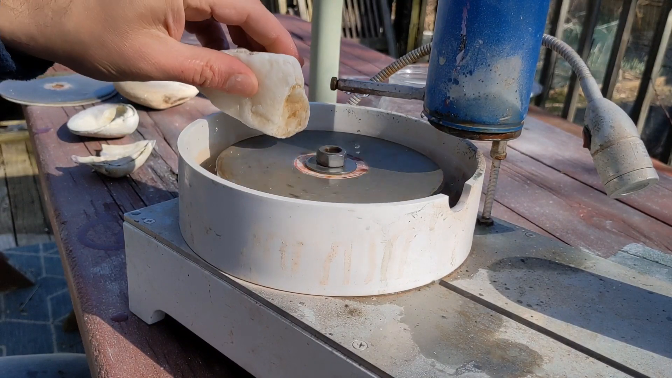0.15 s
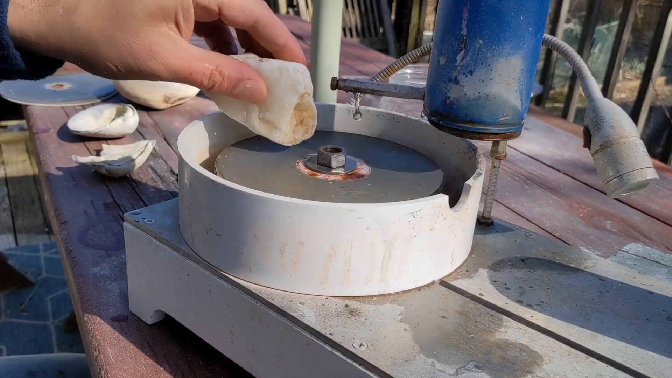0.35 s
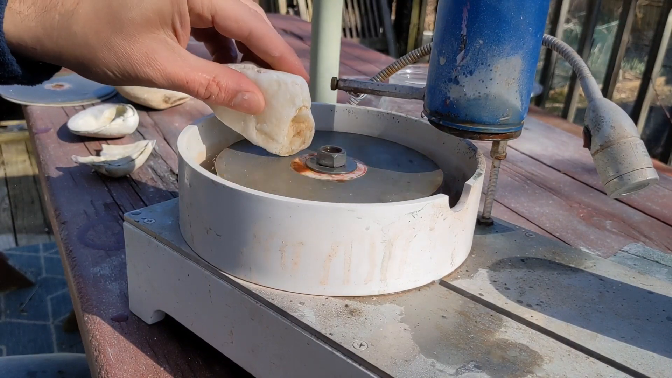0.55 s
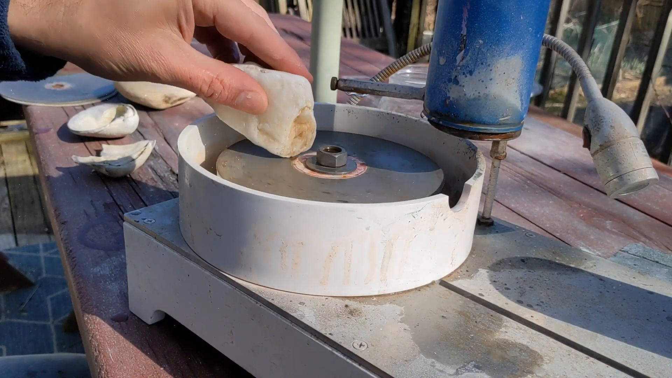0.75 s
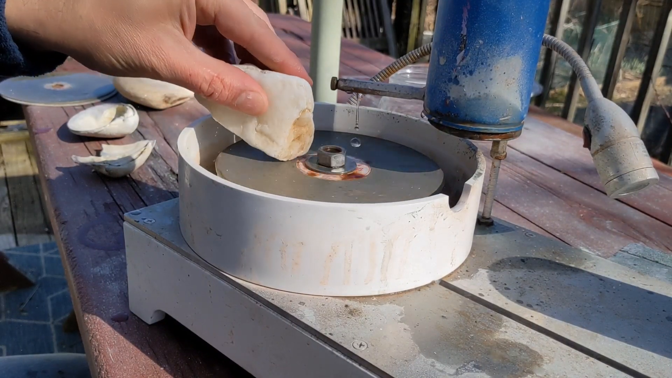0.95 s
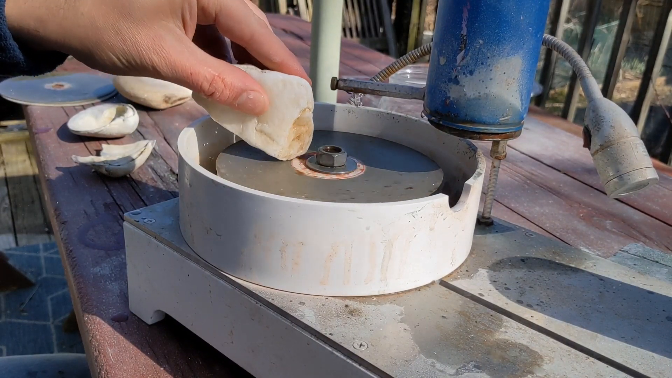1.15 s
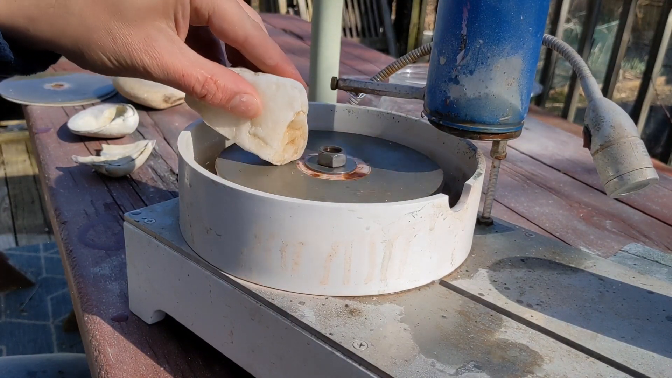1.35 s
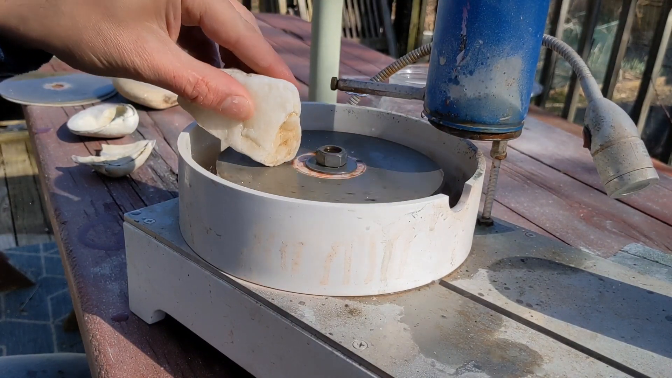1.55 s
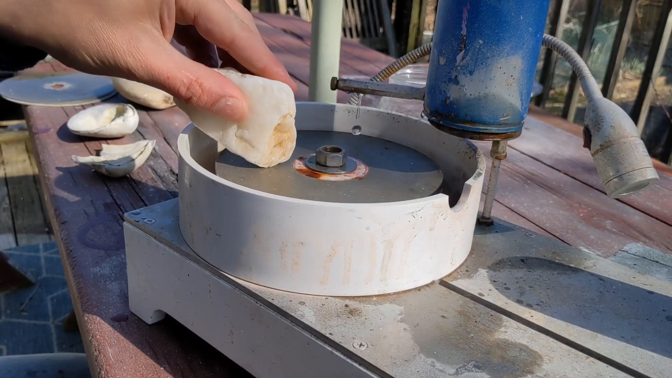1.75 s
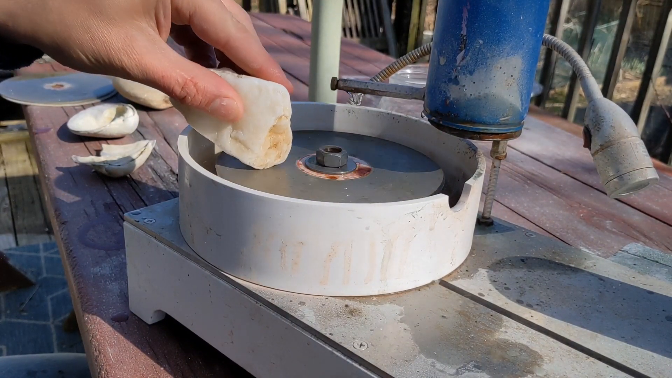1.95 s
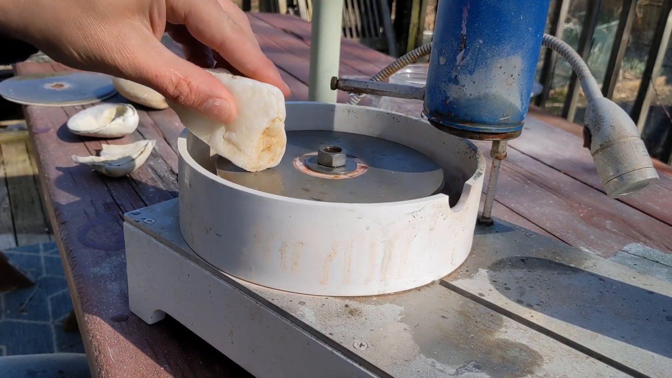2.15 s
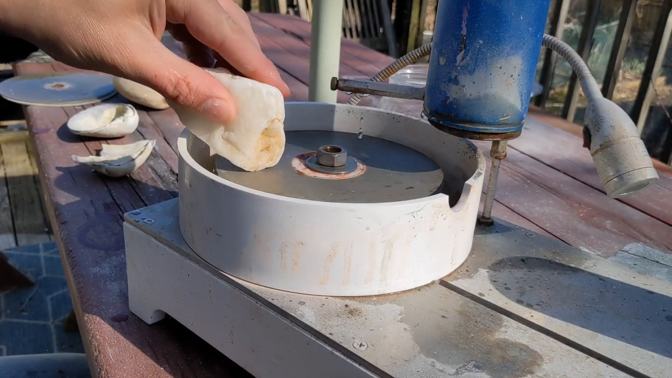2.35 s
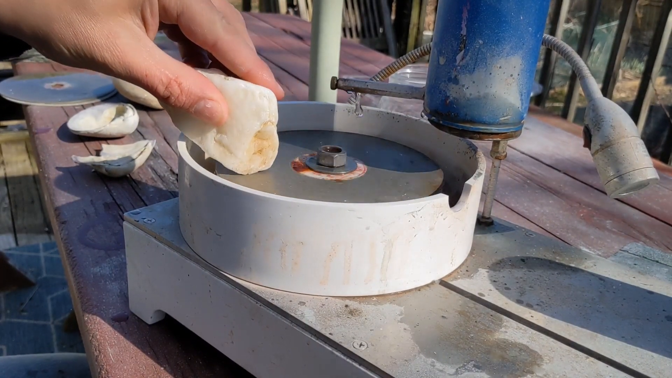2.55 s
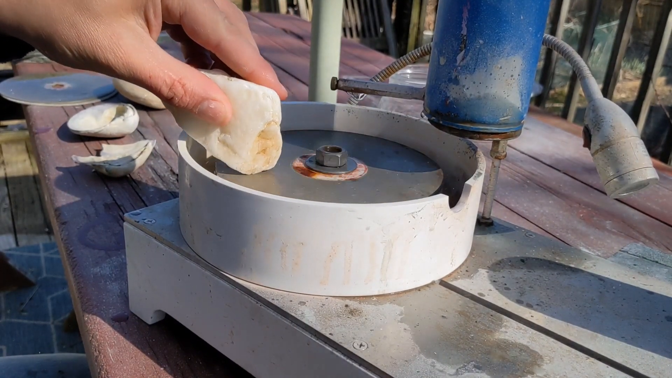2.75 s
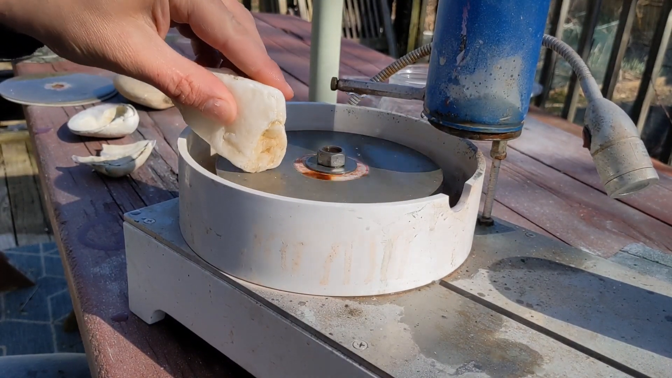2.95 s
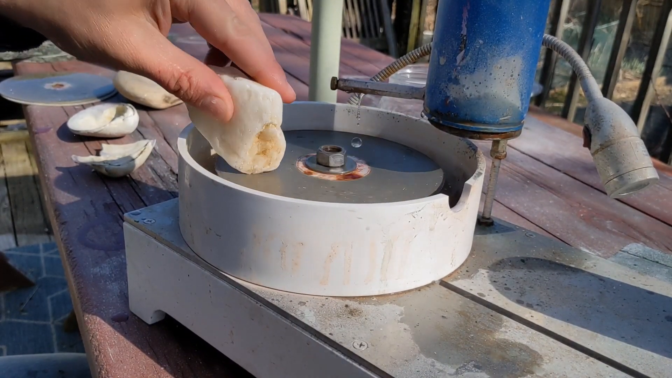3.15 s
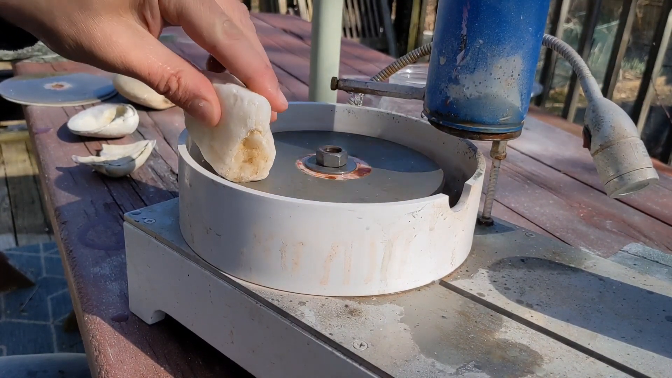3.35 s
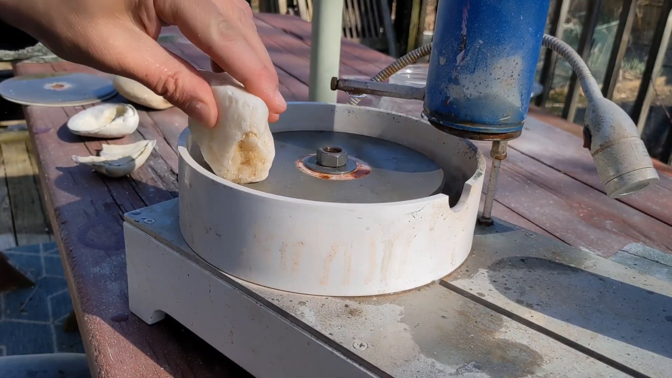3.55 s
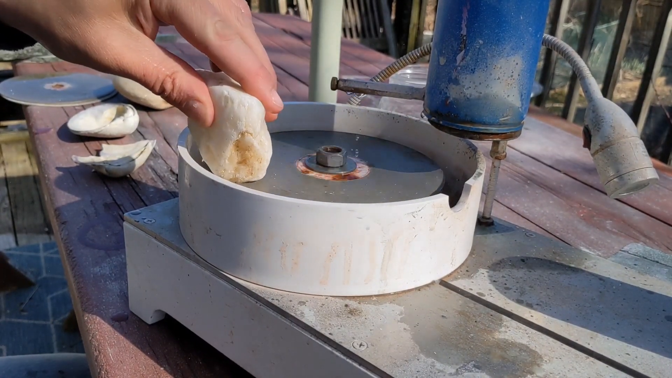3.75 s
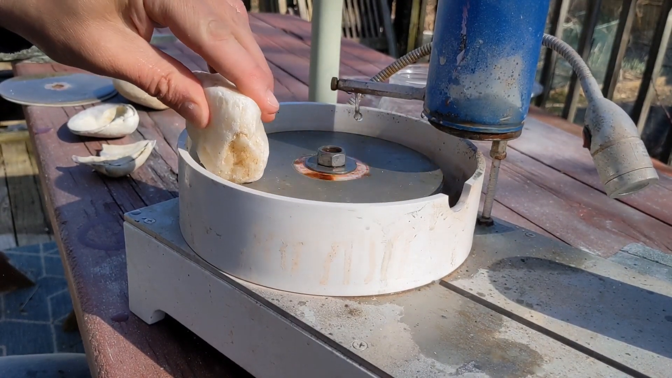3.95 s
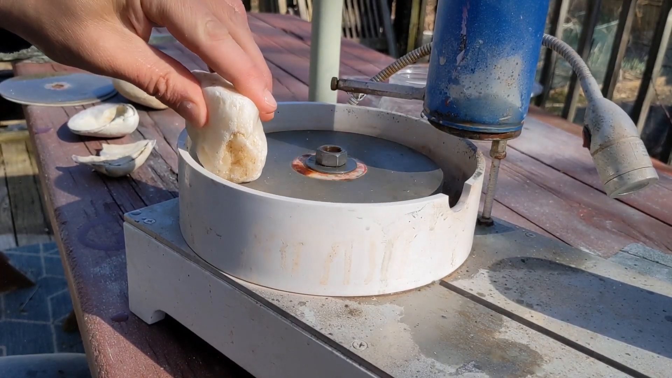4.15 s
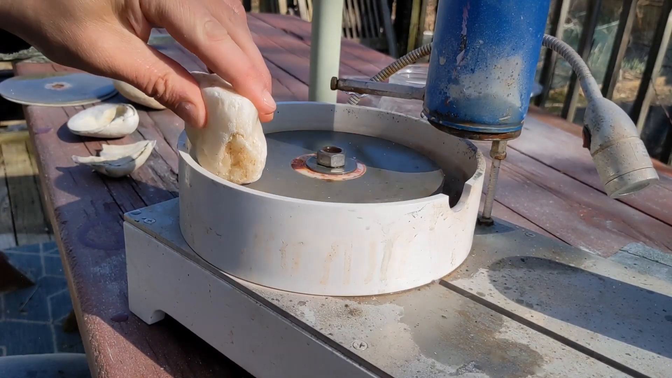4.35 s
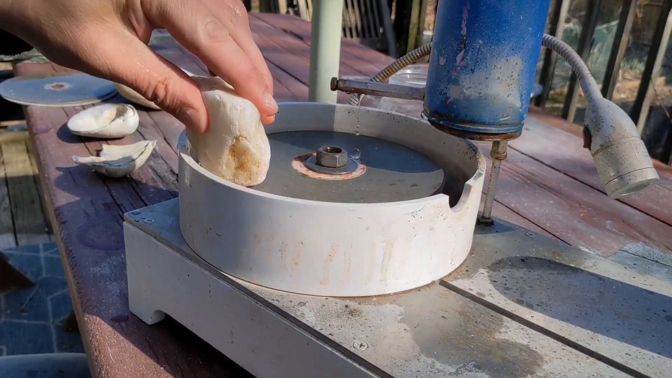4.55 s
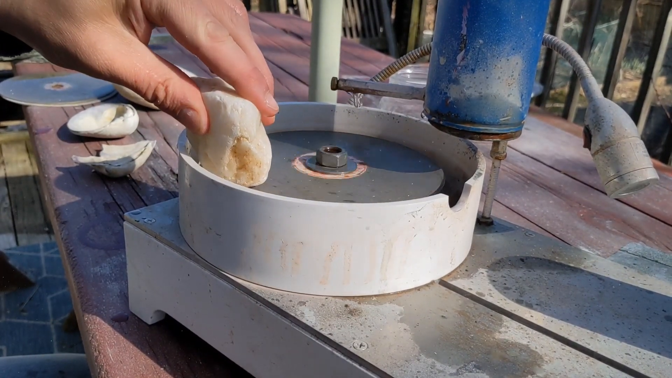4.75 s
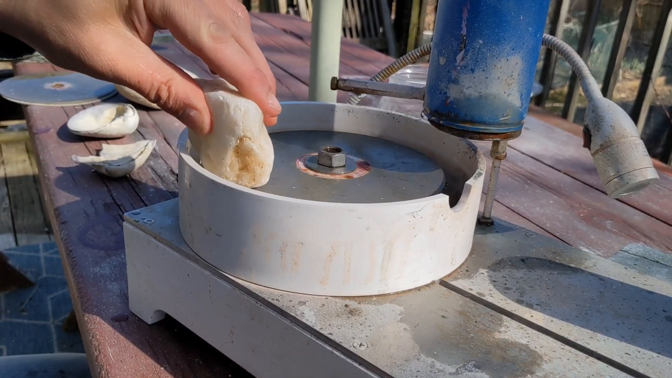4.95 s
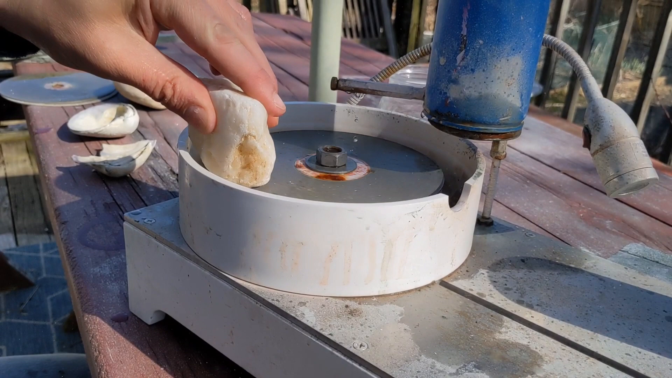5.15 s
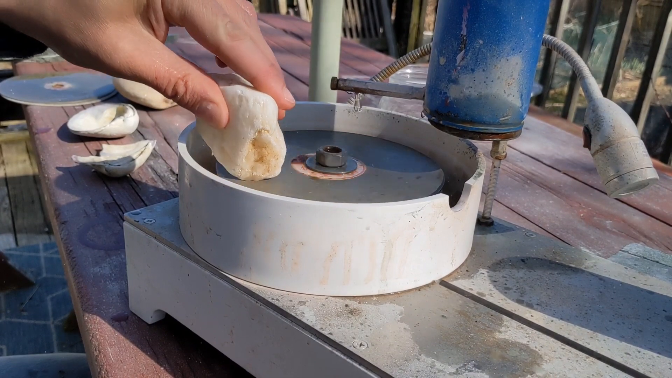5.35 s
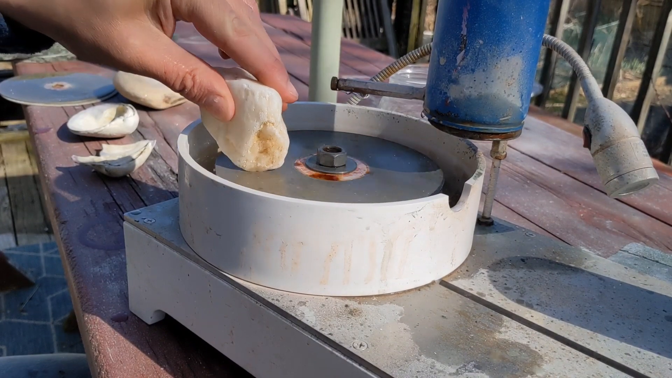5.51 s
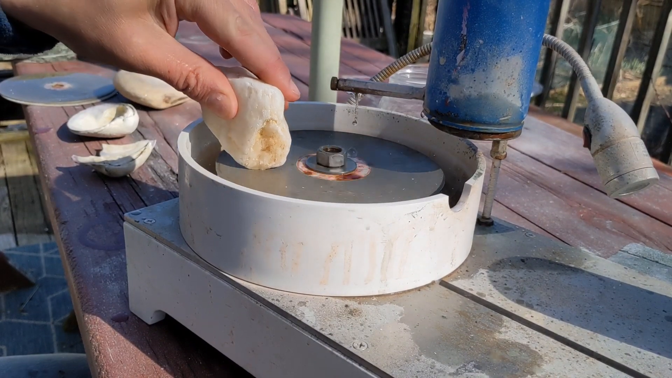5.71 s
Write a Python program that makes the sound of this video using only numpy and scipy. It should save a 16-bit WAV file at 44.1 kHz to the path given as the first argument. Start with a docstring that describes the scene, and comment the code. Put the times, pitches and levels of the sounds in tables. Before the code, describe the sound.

Outdoors, close stereo microphones hear a small machine running free: a quiet, slightly unsteady mid-pitched motor whine with a low hum, a brief soft wind thump near 0.25 s. At about 0.6 s something lightly touches the disc; from 0.7 s a shell grinds steadily with bright, wet, sandy hiss. Until 1.4 s a groaning note pulses with each turn over light knocking. Around 1.5 s the knocks become strong and dull, over twenty a second, drumming a hollow plastic basin while the motor whine drops in pitch and sinks under the noise. Rougher chatter with low thuds comes at 2.5-2.9 s. At 3.3-3.45 s sharp clacks burst out as the shell tips. From 3.6 to 5.1 s the sound is harder, raspier, a clattering rattle with rebounds, slowing slightly. Several small clacks at 5.3-5.5 s lead back to duller knocks and brighter hiss, slightly faster, continuing to the end.

```python
"""Shell on a wet grinder

A shell is pressed on the wet disc of a small lapidary grinder, outdoors and close to the microphone.
Filtered noise makes the hissing grit, a bending sine the motor's whine, which sags under the load.
Once a turn the disc's high spot knocks the shell: impulses ring the plastic basin and crack the shell.
It rebounds, chatters at times and rasps when tipped on its edge; light gusts buffet the microphone."""
import sys
import numpy as np
from scipy import signal
from scipy.fft import rfft, irfft
from scipy.io import wavfile
from scipy.ndimage import uniform_filter1d

SR = 44100
rng = np.random.default_rng(int(sys.argv[2]) if len(sys.argv) > 2 else 0)


def materialize(psi):
    """Save the field psi as 16-bit PCM at rate SR to the path in sys.argv[1].

    A 1-D psi becomes a single channel; in a 2-D psi each row is a channel.
    """
    bounded = np.clip(np.atleast_2d(psi).T, -1, 1)
    quanta = np.round(bounded * 32767).astype(np.int16)
    wavfile.write(sys.argv[1], SR, quanta)


N = 259308
TIME = np.arange(N) / SR  # s
HZ = np.fft.rfftfreq(2 * N, 1 / SR)

# Turning speed of the disc: time_s, speed_turns_per_s
DISC_SPEED = [(0, 22.66), (.6, 22.86), (.9, 22.7), (1.2, 22.47), (1.55, 22.28), (2, 21.58), (2.4, 20.79),
              (2.8, 20.39), (3.2, 20.73), (3.5, 19.21), (3.8, 19.61), (4.15, 19.41), (4.4, 19.62),
              (4.8, 19.14), (5.1, 18.58), (5.45, 19.72), (5.88, 21.02)]
# The hand presses the shell on: start_s, end_s, knock_db, rebound_share (of the knock),
# kept_share (by each later rebound), hardness_0_to_1, drone_db (of the basin, relative)
PRESSES = [(0.746, 1.488, -26.5, 0.46, 0.8, 0.43, -28), (1.508, 1.588, -10.5, 0.13, 0.55, 0.2, -26),
           (1.587, 1.731, -8, 0.081, 0.89, 0.29, -23), (1.74, 2.043, -11, 0.072, 0.36, 0.29, -28),
           (2.038, 3.422, -6, 0.12, 0.93, 0.09, -24), (3.593, 3.936, -13.5, 2.05, 0.044, 1, -25.5),
           (3.936, 4.063, -9.5, 1.57, 0.42, 0.83, -26), (4.062, 4.997, -10, 1.1, 0.81, 0.93, -22.5),
           (5.022, 5.129, -10, 1.03, 0.52, 0.4, -20), (5.13, 5.36, -20, 1.4, 0.54, 0.5, -26.5),
           (5.353, 6.013, -7, 0.14, 0.27, 0.26, -25)]
# Light skating between presses: knock_db, rebound_share, kept_share, hardness (clipped at 1), drone_db
SKATING = (-30.5, 1.02, 1, 2.75, -26.5)
# Bouts of jumping, with a second landing in each turn: start_s, end_s, landing_db, rebound_share
CHATTER = [(2.544, 2.865, -4.5, 0.41), (3.254, 3.32, -7, 0.58), (5.422, 5.525, -12, 1)]
# Time in the air between rebounds: time_s, flight_s
FLIGHT = [(3.9, .0097), (3.96, .0113), (4.1, .0119), (4.46, .0118), (4.52, .0098)]
# Single blows as the shell is tipped on its edge and back: time_s, level_db, hardness_0_to_1
STRIKES = [(3.336, -14, 0.5), (3.3655, -6, 0.73), (3.381, -9, 0.5), (3.3852, -6.5, 0.6), (3.436, -11, .2),
           (5.321, -13, 0.57), (5.358, -15, 1), (5.383, -9.5, .6), (5.424, -16, 0.2), (5.503, -11.5, 0.23)]
# Where the shell lies on the disc: time_s, place (0 near the hub, 1 further out on its face, 2 on edge by the rim)
PLACE = [(1.35, 0.11), (1.8, 0.64), (3.2, 1.4), (3.55, 1.87), (5.15, 2.11), (5.55, 1.1)]
# Resonances of the plastic basin: pitch_hz, width_hz, soft_blow_db, hard_blow_db (relative)
BASIN_MODES = [(228.4, 32, -6, -0.5), (320, 21, -6, -4.5), (353, 60, -5, -8), (415.3, 43.2, 0.5, -4),
               (510.6, 12, -8.5, -6.5), (586, 37.5, -4.5, -9), (646.2, 47, -1, 2), (713, 52, -8, -3),
               (830.3, 21, -13, 0), (951, 73, -12.5, -12.5), (1140, 55, -21, -15)]
# Resonances of the machine frame, shaken when the shell drops back: pitch_hz, width_hz, level_db (relative)
FRAME_MODES = [(119, 23, -3.5), (155, 4.1, 4.5), (182.3, 8, 7.5), (234, 14.1, 5)]
# Tone of the shell's crack: pitch_hz, level_db (relative)
CRACK_TONE = [(500, -54.5), (900, -5), (1290, 7.5), (1750, -2.5), (2100, -3), (2750, -2), (3400, -8.5),
              (3800, -7), (5200, -6.5), (9000, -12), (16000, -13.5)]
# Tone of the rasp: pitch_hz, level_db (relative)
RASP_TONE = [(500, -29.5), (1100, -17.5), (1420, -4.5), (1750, -15), (2400, -19.5), (3500, -31),
             (8000, -54)]
# Note of the gritty groan: time_s, pitch_hz
GROAN_PITCH = [(.8, 394), (.9, 350), (1.03, 361.4), (1.11, 420), (1.38, 400)]
# Swells of the grit's hiss, before its overall lift: time_s, level_db
GRIND_LEVEL = [(0.7, -28.5), (0.74, -24.5), (0.94, -23), (1.56, -23), (2.06, -24), (3.18, -24.5),
               (3.33, -20.5), (3.8, -28), (4.23, -25.5), (4.48, -27), (4.51, -23.5), (5.0, -26),
               (5.65, -23), (5.88, -26)]
# Tone of the grit's hiss: pitch_hz, level_db (relative)
HISS_TONE = [(500, -21), (1200, -8.5), (1600, -14), (2400, -7.5), (3200, -10.5), (3550, -14.5), (3900, -9),
             (5000, -12), (8000, -6), (10100, -6.5), (10600, -5.5), (11100, -6), (13500, -4.5), (15800, -8)]
# Bright bands of the hiss with the shell near the hub: pitch_hz, width_hz, lift_db
HUB_BANDS = [(2800, 870, 6), (4270, 690, 3.5), (5410, 650, 4), (7090, 800, 7), (9300, 1060, 6),
             (11500, 760, 5), (12900, 740, 6), (14700, 900, 3.5)]
# Bright bands with the shell further out: pitch_hz, width_hz, lift_db
FACE_BANDS = [(2850, 200, 6.3), (4620, 930, 4.3), (5880, 360, 9.9), (6780, 670, 4.9), (8350, 670, 7),
              (9930, 530, 7.5), (12530, 1400, 5.3), (15240, 1200, 7.5)]
# Bright bands with the shell on its edge by the rim: pitch_hz, width_hz, lift_db
RIM_BANDS = [(3720, 270, 2.8), (5300, 320, 1.63), (8050, 730, 1.6), (9260, 460, 4.2), (12960, 1200, 5.3),
             (14700, 1500, 6.3)]
# Slide of these bands as the contact moves: time_s, pitch_factor
BAND_SLIDE = [(.7, 1.03), (1.15, 1), (1.55, .975), (1.8, 1.015), (2.6, 1), (3.2, .99), (3.6, 1)]
# The contact catches and one band sings out: start_s, end_s, first_hz, last_hz, width_hz, lift_db
FLARES = [(0.717, 1.022, 12800, 12400, 500, 5), (0.853, 1.496, 11100, 10950, 450, 8.5),
          (0.845, 1.33, 14700, 14500, 550, 5.5), (1.46, 2.05, 8810, 8900, 450, 4),
          (1.503, 1.947, 12020, 11800, 500, 3), (1.65, 2.204, 14100, 13060, 700, 6),
          (1.68, 2.492, 15700, 14800, 900, 8), (2.8, 3.17, 15000, 15200, 700, 3),
          (5.57, 5.95, 15200, 15200, 700, 3), (5.615, 5.954, 13300, 13500, 700, 5)]
# The motor's whine: time_s, pitch_hz
WHINE_PITCH = [(0, 773), (.36, 772), (.69, 777), (1, 765), (1.25, 758), (1.5, 732), (1.7, 681), (2.5, 653)]
# Tone of the free-running machine and open air: pitch_hz, level_db (relative)
IDLE_TONE = [(20, -36), (40, -19), (56, 0), (75, -15.5), (120, -7), (200, -12), (290, -13), (380, -3.5),
             (520, -18.5), (1050, -22), (1550, -19), (2400, -21), (5000, -25), (15800, -44)]
# Gusts on the microphone: peak_s, level_db, swell_and_fade_s
GUSTS = [(.25, -25.5, 0.031), (.35, -37.5, 0.51), (.93, -30, 0.028)]
# Tone of the wind's buffeting: pitch_hz, level_db (relative)
BUFFET_TONE = [(20, -33), (55, -4.5), (85, -5.5), (160, -10), (260, -17.5), (600, -58), (2000, -85)]
# Tonal balance between the microphones: pitch_hz, left_minus_right_db
STEREO_LEAN = [(60, -9), (110, 4), (200, -3), (380, 2.5), (700, -6.5), (1290, -1.5), (2380, 4.5), (4400, 2),
               (8120, 0.5), (15000, 4.5)]

START_TURN = .39
EASE_S = 0.049  # the hand takes this long to change its hold
TOUCH_S, TOUCH_DB, TOUCH_RISE_S, TOUCH_FADE_S = 0.581, -21, 0.01, 0.023  # a first light touch
SETTLE_S = 0.67  # the shell comes down for good
BED_IN_S = 0.085  # it bears hard enough to shake the basin this much later
CHATTER_KNOCK_DB, CHATTER_DRONE_DB = -2, 6  # a jumping shell meets the high spot less, shakes the basin more
LANDING_TURN = 0.385  # share of a turn from the knock to the landing
LANDING_HARD = 0.67  # hardness, 0-1
SHARP_SOFT_DB, SHARP_HARD_DB = -29.5, 27.5  # relative crack of the softest blow; what full hardness adds
SCUFF_SHARE, SCUFF_S = .0055, .009  # drag of each blow over the grit
CLICK_SHARE, SKIP_SHARE, CRUNCH_SHARE = .52, .5, .11  # a crack is a click, one skip and a crumble
RASP_FLAT_DB, RASP_EDGE_DB, RASP_CHATTER_DB = -83, -31, -44
BEND_S = .0025  # travel time of a 1 kHz bending wave from the shell to the basin's wall
GROAN_START_S, GROAN_END_S, GROAN_EASE_S, GROAN_DB = 0.787, 1.393, 0.12, -27.5
FLARE_EASE_S = 0.13
WHINE_DB = -35  # running free, before panning
WHINE_SAG_DB, WHINE_SAG_JITTER = -.05, .014  # per Hz lost under load: level change, added jitter in radians
IDLE_DB = -37.5
EDGE_HZ = 15900  # upper band limit


def blows(turns, uneven_db=0.96, dull=0.37, glancing=0.3, softening=0.34, count=3):
    """The knock of each turn and its rebounds, as four trains: pushes, raps, cracks and heavy falls."""
    trains = np.zeros((4, 2 * N))
    at = each_turn(turns)
    knock_db, rebound, kept, hard, _ = hold()[:, at]
    knock = amp(knock_db + CHATTER_KNOCK_DB * chattering()[at]) * on_disc(BED_IN_S)[at]
    strength, angle = rng.standard_normal((len(at), 2, count + 1)).transpose(1, 2, 0)
    hard = hard + .05 * angle[0]  # no two turns meet the shell alike
    push, rap, crack = blow(knock * amp(uneven_db * strength[0]), hard)
    rap = rap * (1 - glancing * tipped()[at])  # the edge is only clipped by the high spot
    trains[:3, at] += [push, rap, crack]
    for k in range(1, count + 1):
        share = rebound * np.clip(kept, 0, 1) ** (k * (k - 1) / 2)
        size = knock * share * amp(uneven_db * strength[k])
        late = (k * curve(FLIGHT)[at] * SR).astype(int)
        push, rap, _ = blow(size, hard * softening ** (k * k))
        soft_crack = crack * dull * share ** 2  # low rebounds land softly
        trains[:, at + late] += [push, rap, soft_crack, size]
    falls = landings(turns)
    landing_blows = blow(falls, np.full(N, LANDING_HARD))
    return trains[:, :N] + np.vstack([landing_blows, falls])


def blow(size, hard):
    """Splits blows by their hardness into a soft push, a hard rap and a crack."""
    hard = np.clip(hard, 0, 1)
    return size * np.array([1 - hard, hard, amp(SHARP_SOFT_DB + SHARP_HARD_DB * hard)])


def landings(turns, flight_s=0.016, scatter=0.019, uneven_db=3.0):
    """While it chatters the shell falls back once a turn and rebounds once."""
    train = np.zeros(2 * N)
    at = each_turn(turns - LANDING_TURN)
    for start, end, db, rebound in CHATTER:
        falls = at[(at > start * SR) & (at < end * SR)]
        first, second, flight = rng.standard_normal((len(falls), 3)).T
        late = (flight_s * (1 + scatter * flight) * SR).astype(int)
        train[falls] += amp(db + uneven_db * first)
        train[falls + late] += rebound * amp(db + uneven_db * second)
    return train[:N]


def strikes():
    """The single blows, as three trains: pushes, raps and cracks."""
    trains = np.zeros((3, N))
    for s, db, hard in STRIKES:
        trains[:, round(s * SR)] = blow(amp(db), hard)
    return trains


def basin(pushes, raps, falls, turns, knock_db=18.0, rap_db=19, frame_db=9, throb=0.35, drone_db=-2):
    """Blows and rubbing ring the basin; hard blows favour its own set of mode levels."""
    soft = bent(modes([(hz, width, soft_db) for hz, width, soft_db, _ in BASIN_MODES]))
    hard = bent(modes([(hz, width, hard_db) for hz, width, _, hard_db in BASIN_MODES]))
    drag = SCUFF_SHARE * dying(pushes + raps, SCUFF_S) * track(turns)
    thuds = amp(knock_db) * filtered(judder(pushes) + drag, soft)
    thuds = thuds + amp(rap_db) * filtered(raps, hard)
    shake = amp(frame_db) * filtered(falls, bent(modes(FRAME_MODES)))
    rubbing = track(turns) * (1 + throb * np.cos(2 * np.pi * turns))
    drone = unit(filtered(rubbing, soft))
    *_, rub_db = hold()
    drone_gain = amp(rub_db + CHATTER_DRONE_DB * chattering() + drone_db) * on_disc(BED_IN_S)
    return thuds + shake + drone_gain * drone


def judder(force, gap_s=0.00267, before=0.16, after=0.18):
    """Lying flat, the shell rides over the high spot: a small push on each side of the knock."""
    flat = force * (1 - np.clip(tipped() + chattering(), 0, 1))
    gap = round(gap_s * SR)
    return force + before * np.roll(flat, -gap) + after * np.roll(flat, gap)


def modes(rows):
    """Gain of a resonant body: each mode is down to half at 0.9 of its width from the centre."""
    power = sum(amp(db) ** 2 / (1 + ((HZ - hz) / (.9 * width)) ** 2) ** 2 for hz, width, db in rows)
    return np.sqrt(power) / (1 + (110 / (HZ + 1)) ** 4)  # rolls off the bass


def bent(gain):
    """The ring of a plate with this gain: bending waves bring the treble first and the bass last."""
    return causal(gain) * np.exp(-4j * np.pi * BEND_S * np.sqrt(1000 * HZ))


def shell(cracks, turns, crack_db=19.0, skip_s=0.00097, rough_db=3.5):
    """The hard edge cracks at each blow, skips once on the grit, and rasps between blows."""
    roughness = track(turns, channels=2) + .6 * track(turns)
    crumble = CRUNCH_SHARE * dying(cracks, .0028) * roughness
    strike = CLICK_SHARE * (cracks + SKIP_SHARE * np.roll(cracks, round(skip_s * SR)))
    crack = filtered(strike + crumble, bent(colour(CRACK_TONE)))
    rough = (noise() + .5 * track(turns)) * amp(rough_db * wander(120))
    rasp = unit(filtered(rough, colour(RASP_TONE)))
    scrape = amp(RASP_FLAT_DB) * on_disc() + amp(RASP_EDGE_DB) * tipped()
    scrape = scrape + amp(RASP_CHATTER_DB) * chattering()
    return amp(crack_db) * crack + scrape * rasp


def grit(turns, hiss_db=3.5, flicker_db=1.5, grains_per_s=2500, grain_share=0.33, size_db=3.0,
         swing=0.0046, bite=0.28, narrow=5, lead=0.024, scattered=0.93):
    """Countless wet grains scratch the shell; its edge bites into the high spot just before each knock."""
    sizes = amp(size_db * np.minimum(rng.exponential(1, N), 5))
    sizes = sizes * (rng.random(N) < grains_per_s / SR)
    grains = unit(sizes * noise())
    scratch = noise() + scattered * walls(noise(channels=1)) + grain_share * grains
    hiss = unit(bright_bands(filtered(scratch, causal(colour(HISS_TONE)))))
    height = np.cos(2 * np.pi * (turns + lead))  # lead in turns
    pressure = 1 + swing * height + bite * tipped() * (np.exp(narrow * (height - 1)) - .2)
    return amp(hiss_db) * contact() * hiss * unit(pressure * amp(flicker_db * wander(270)))


def bright_bands(x, patchy_db=1.8):
    """Lifts the bands that belong to the shell's place on the disc; they slide, shimmer and flare."""
    hz, t, z = signal.stft(x, SR, nperseg=512)
    place, slide = (np.interp(t, *np.transpose(rows)) for rows in (PLACE, BAND_SLIDE))
    patches = uniform_filter1d(rng.standard_normal(z.shape[1:]), size=7, axis=0)
    lift_db = patchy_db * unit(uniform_filter1d(patches, size=6, axis=1))
    for k, bands in enumerate([HUB_BANDS, FACE_BANDS, RIM_BANDS]):
        nearness = np.maximum(1 - abs(place - k), 0)
        for centre, width, db in bands:
            lift_db += db * nearness * .5 ** ((2 * (hz[:, None] / slide - centre) / width) ** 2)
    for start, end, first_hz, last_hz, width, db in FLARES:
        centre = np.interp(t, [start, end], [first_hz, last_hz])
        swell = np.interp(t, TIME, spell(start, end, FLARE_EASE_S))
        lift_db += db * swell * .5 ** ((2 * (hz[:, None] - centre) / width) ** 2)
    return signal.istft(z * amp(lift_db), SR, nperseg=512)[1][:, :N]


def walls(x, ring_s=0.0034):
    """The basin's wall scatters a sound differently toward each microphone."""
    t = TIME[:SR // 50]
    scatter = rng.standard_normal((2, len(t))) * np.exp(-t / ring_s)
    return unit(signal.fftconvolve(x, scatter, axes=1)[:, :N])


def contact():
    """Strength of the scratching: one brief touch, then the steady grind."""
    since = np.maximum(TIME - TOUCH_S, 0)
    touch = amp(TOUCH_DB) * np.minimum(since / TOUCH_RISE_S, 1) * np.exp(-since / TOUCH_FADE_S)
    return touch + amp(curve(GRIND_LEVEL)) * on_disc()


def groan(turns, peak_turn=0.19, waver_db=2.5, scrape_db=-6):
    """Friction feeds one unsteady note of the basin and a coarse scrape; both swell and die in every turn."""
    phase = (turns - peak_turn + .5) % 1 - .5
    note = np.cos(2 * np.pi * curve(GROAN_PITCH) * phase / curve(DISC_SPEED) + .6 * wander(70))
    scrape = filtered(rng.standard_normal(N), modes([row[:3] for row in BASIN_MODES]))
    swell = np.cos(np.pi * phase) ** 2 * amp(GROAN_DB + waver_db * wander(23))
    swell = swell * spell(GROAN_START_S, GROAN_END_S, GROAN_EASE_S)
    return swell * (unit(note) + amp(scrape_db) * unit(scrape))


def hold():
    """Knock dB, rebound, share kept, hardness and drone dB: skating, except during a press."""
    rest = np.array(SKATING)[:, None]
    presses = sum((np.array(press)[:, None] - rest) * spell(start, end, EASE_S)
                  for start, end, *press in PRESSES)
    return rest + presses


def chattering():
    """1 during a bout of chatter."""
    return sum(spell(start, end, EASE_S) for start, end, *_ in CHATTER)


def tipped():
    """The shell tips from its face (0) on to its edge (about 1) as it nears the rim."""
    return np.maximum(curve(PLACE) - 1, 0)


def on_disc(after_s=0):
    """1 once the shell has lain on the disc this long."""
    return spell(SETTLE_S + after_s, np.inf, EASE_S)


def each_turn(turns):
    """The samples at which a new turn begins."""
    return np.flatnonzero(np.diff(np.floor(turns)) > 0)


def track(turns, channels=1, repeat=.75, renew_turns=9, size=2048, count=16):
    """Roughness under the shell: most comes round again each turn, and slowly changes as the shell drifts."""
    surface = rng.standard_normal((channels, count, size))
    angle = (turns % 1 * size).astype(int)
    blend, ring = np.modf(turns / renew_turns)
    ring, blend = ring.astype(int), blend * np.pi / 2
    known = np.cos(blend) * surface[:, ring % count, angle]
    known = known + np.sin(blend) * surface[:, (ring + 1) % count, angle]
    share = np.clip(repeat, 0, 1)
    return np.sqrt(share) * known + np.sqrt(1 - share) * noise(channels)


def motor(waver_db=0.5, jitter=0.27, whirr_db=-42, whirr_hz=715, whirr_width_hz=80):
    """A whine that sags and fades under load, over the whirr of the running machine and open air."""
    hz = curve(WHINE_PITCH)
    sag_hz = hz[0] - hz
    unsteady = (jitter + WHINE_SAG_JITTER * sag_hz) * wander(42)
    whine = np.sqrt(2) * np.sin(2 * np.pi * np.cumsum(hz) / SR + unsteady)
    whine *= amp(WHINE_DB + WHINE_SAG_DB * sag_hz + waver_db * wander(21))
    whirr = unit(filtered(noise(channels=1), 1 / (1 + ((HZ - whirr_hz) / whirr_width_hz) ** 2)))
    air = unit(filtered(noise() + 1.86 * noise(channels=1), colour(IDLE_TONE)))
    pan = amp([[3.5], [-3.5]])  # toward the left
    return (whine + amp(whirr_db) * whirr) * pan + amp(IDLE_DB) * air


def wind():
    """Light gusts buffet the microphone: low noise that swells and fades exponentially."""
    gusts = sum(amp(db) * np.exp(-abs(TIME - s) / fade_s) for s, db, fade_s in GUSTS)
    return gusts * unit(filtered(noise() + noise(channels=1), colour(BUFFET_TONE)))


def deck(x, t60=0.29, wet_db=-20):
    """Short scattered reflections from the bench and the railing, as decaying noise."""
    t = TIME[:SR // 3]
    tail = rng.standard_normal((2, len(t))) * amp(-60 * t / t60) * (t > .004)
    return amp(wet_db) * signal.fftconvolve(x, tail / np.linalg.norm(tail[0]), axes=1)[:, :N]


def amp(db):
    """Decibels to gain."""
    return 10 ** (np.asarray(db) / 20)


def unit(x):
    """Scales to rms 1."""
    return x / np.sqrt(np.mean(x ** 2) + 1e-20)


def curve(rows):
    """A table of time_s and value, drawn out to every sample."""
    return np.interp(TIME, *np.transpose(rows))


def spell(start, end, ease_s):
    """1 from start to end, with a straight ramp at each side."""
    return np.clip(np.minimum(TIME - start, end - TIME) / ease_s + .5, 0, 1)


def colour(points):
    """Gain at every frequency from pitch_hz and level_db points."""
    hz, db = np.transpose(points)
    return amp(np.interp(np.log(HZ + 1), np.log(hz + 1), db))


def filtered(x, gain):
    """Applies a frequency response."""
    return irfft(rfft(x, 2 * N) * gain)[..., :N]


def causal(gain):
    """The minimum-phase response of this gain, which rings only after a blow, with unit energy."""
    log_gain = np.log(np.maximum(np.r_[gain, gain[-2:0:-1]], 1e-5))
    return np.exp(np.conj(signal.hilbert(log_gain)))[:len(gain)] / np.sqrt(np.mean(gain ** 2))


def noise(channels=2):
    """Unrelated white noise for each channel."""
    return rng.standard_normal((channels, N))


def wander(hz):
    """Random drift of rms 1, up to about this rate."""
    return unit(filtered(rng.standard_normal(N), 1 / (1 + (HZ / hz) ** 4)))


def dying(x, seconds):
    """Gives each impulse an exponential tail."""
    return signal.lfilter([1], [1, -np.exp(-1 / (seconds * SR))], x)


def scene():
    """The turning disc times the grinding; reflections, the motor and wind lie around it."""
    turns = START_TURN + np.cumsum(curve(DISC_SPEED)) / SR
    *trains, falls = blows(turns)
    pushes, raps, cracks = trains + strikes()
    grinding = basin(pushes, raps, falls, turns) + groan(turns) + shell(cracks, turns) + grit(turns)
    return grinding + deck(grinding) + motor() + wind()


def record(dry, lag_s=.00009):
    """The two microphones differ in colour and the left one is nearer; then the band limit."""
    lean = np.sqrt(colour(STEREO_LEAN)) * np.exp(1j * np.pi * HZ * lag_s)
    heard = filtered(dry, np.array([lean, 1 / lean]))
    low_pass = signal.firwin(801, EDGE_HZ, window=("kaiser", 9), fs=SR)
    return signal.oaconvolve(heard, low_pass[None], "same")


dry = scene()
out = record(dry)
materialize(out)
```